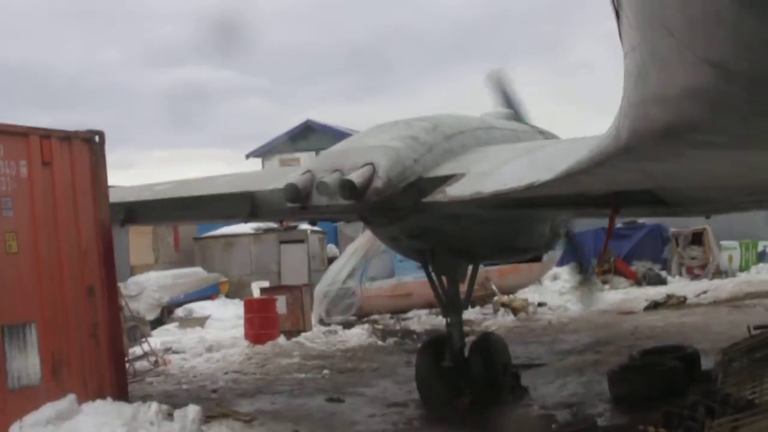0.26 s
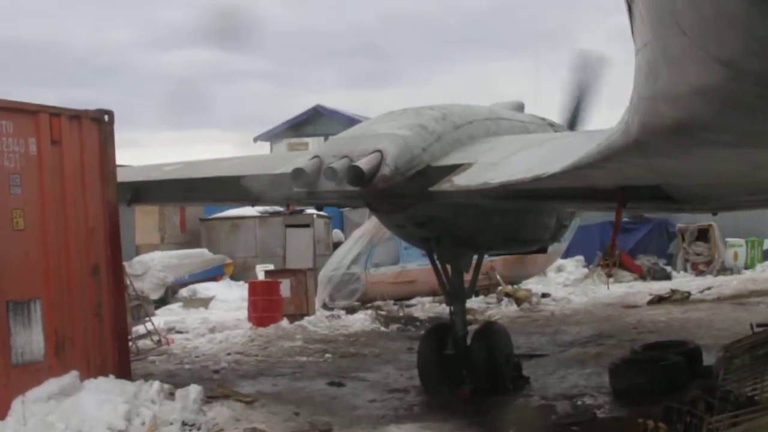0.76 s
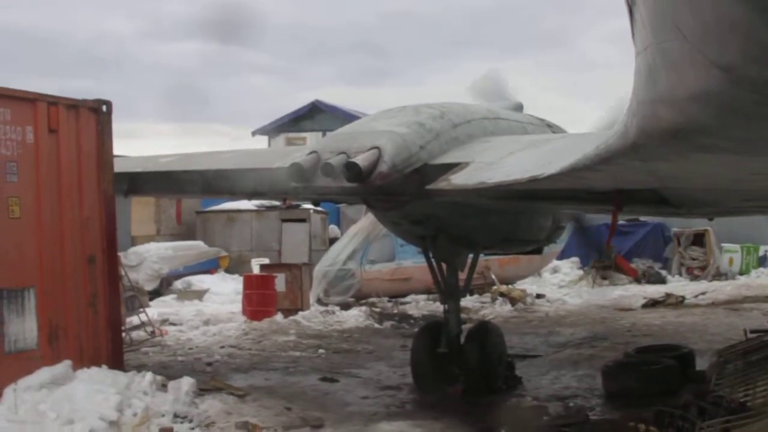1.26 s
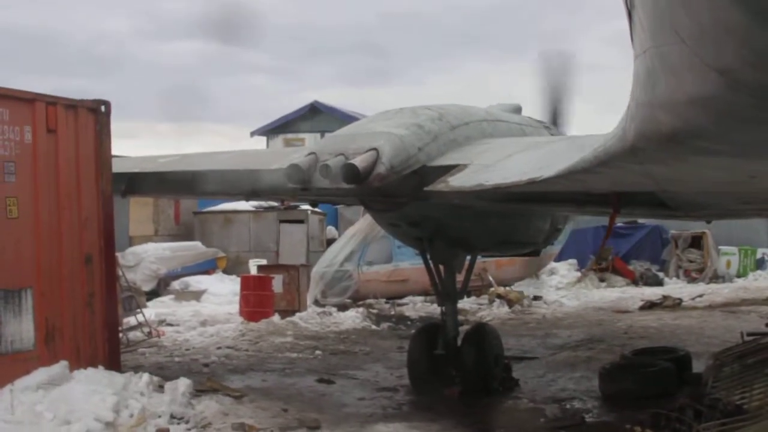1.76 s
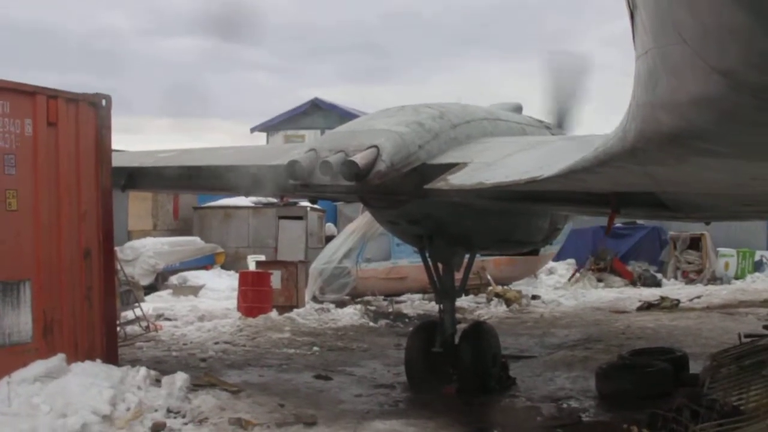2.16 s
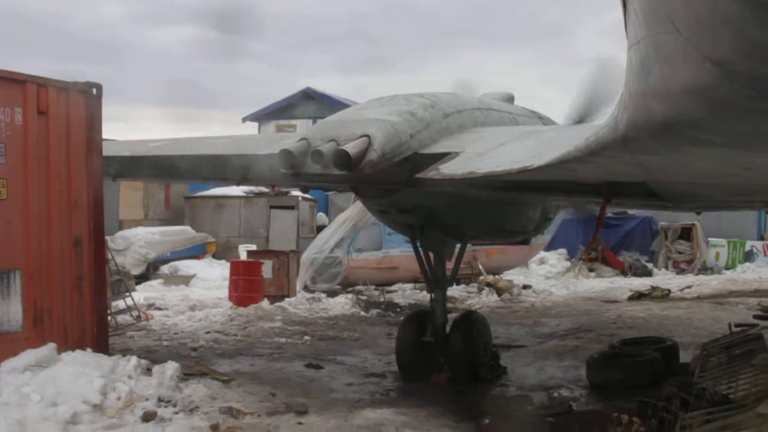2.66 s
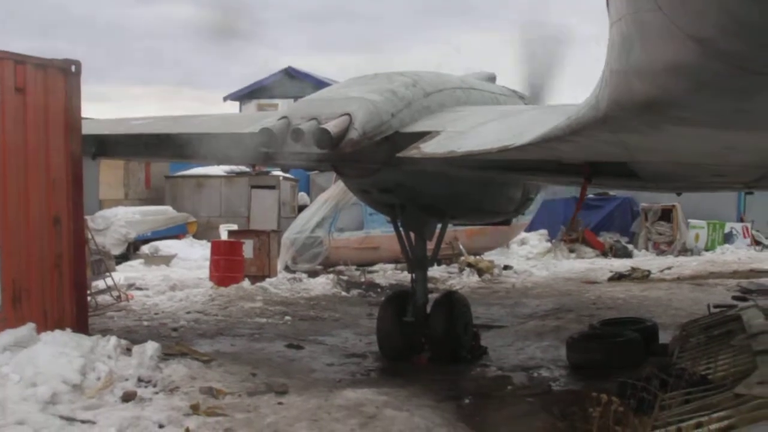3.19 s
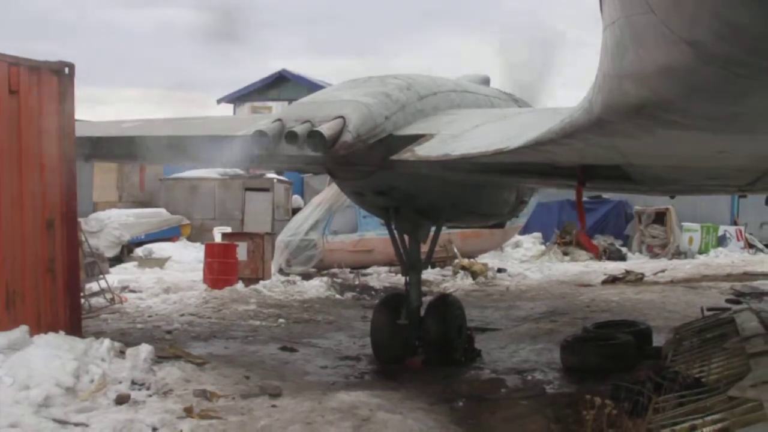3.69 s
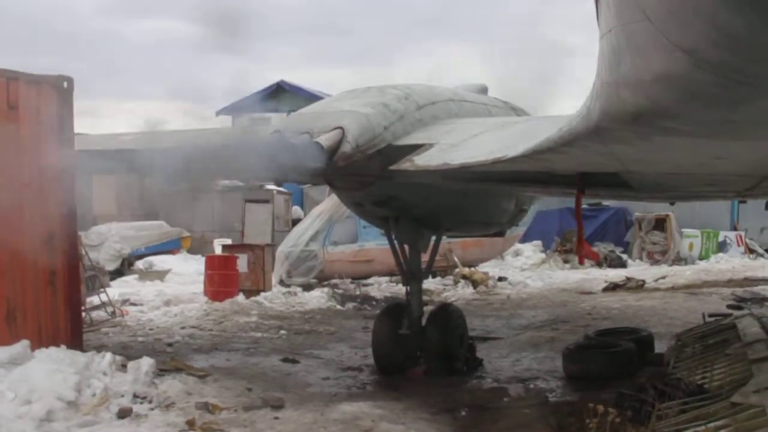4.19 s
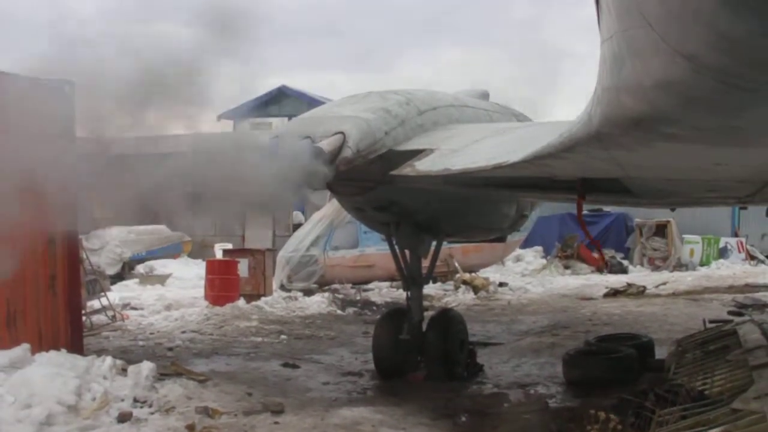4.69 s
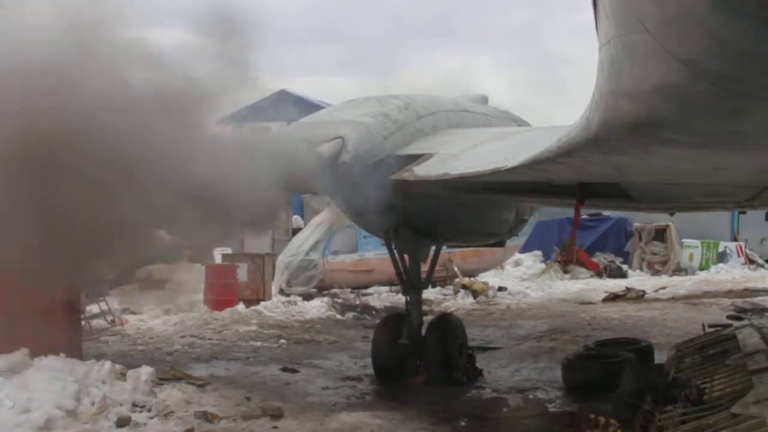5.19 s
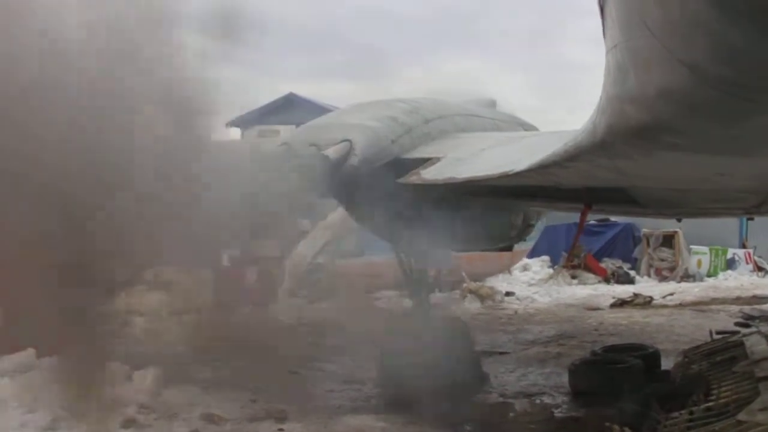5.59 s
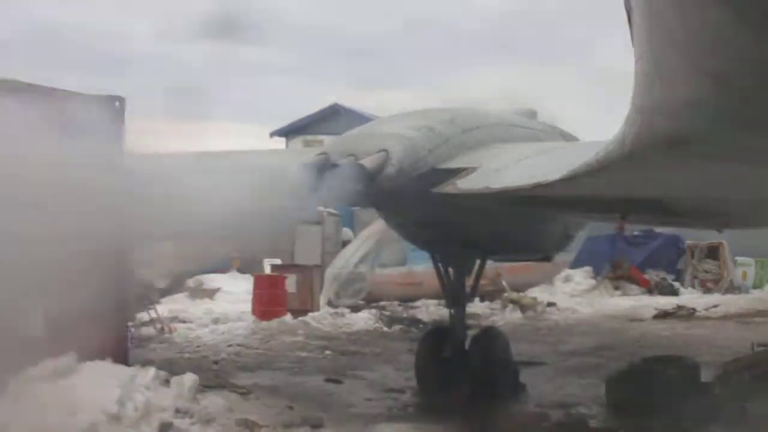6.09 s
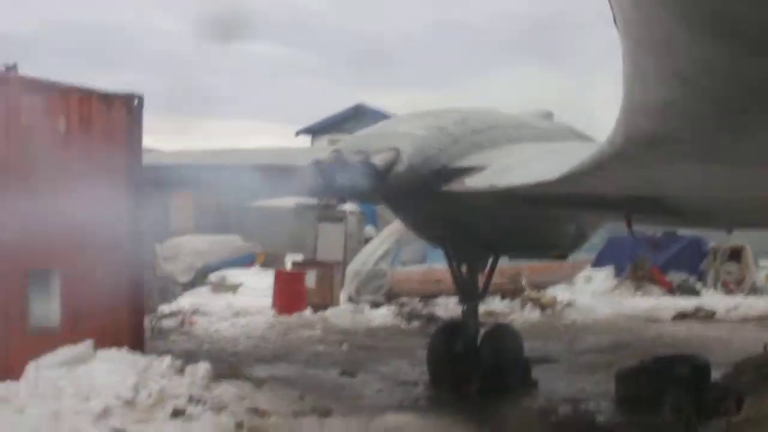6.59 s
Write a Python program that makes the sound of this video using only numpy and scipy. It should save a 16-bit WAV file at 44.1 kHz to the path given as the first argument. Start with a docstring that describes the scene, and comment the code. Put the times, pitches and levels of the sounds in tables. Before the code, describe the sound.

A large piston aircraft engine starts in an open yard, heard from behind its exhaust pipes on a small microphone. At 0 s a short starter rumble fades to a faint grind with a thin high whine; small hisses and squeaks appear around 0.1 to 0.4 s and faintly near 2.3 s. Single cylinders fire irregularly: breathy, spitting chuffs with hollow metallic ringing, clustered in the first 1.2 s, then sparser, with gaps around 1.3 and 2.6 s. From 2.9 s firings come rapidly, with dull thumps, stuttering harder from 4.3 s. Around 5 s heavy barks lead into a merged, throbbing, raspy roar, with uneven pops still poking through. From 5.7 to 6.4 s propeller wash buffets the microphone, with crackling, clipped shoves and the level squeezed down. After 6.5 s wind and roar ease somewhat, the engine still running at the cut. Short, sparse echoes answer throughout.

```python
"""Cold start of a piston aircraft engine

A large engine catches in a yard, heard from behind its exhaust stacks. Single cylinders fire as
hissing chuffs, pulsed jet noise ringing the pipes, over the starter's whine and rumble; the firings
then crowd into a roar of throbbing noise. Sparse decaying echoes answer the exhaust. The propeller's
wash, low-frequency noise with brief shoves, reaches the small microphone and drives it to its stops."""
import sys
import numpy as np
from scipy import signal
from scipy.fft import rfft, irfft
from scipy.io import wavfile
from scipy.ndimage import uniform_filter1d

SR = 44100
rng = np.random.default_rng(int(sys.argv[2]) if len(sys.argv) > 2 else 0)


def materialize(psi):
    """Save the field psi as 16-bit PCM at rate SR to the path in sys.argv[1].

    A 1-D psi becomes a single channel; in a 2-D psi each row is a channel.
    """
    bounded = np.clip(np.atleast_2d(psi).T, -1, 1)
    quanta = np.round(bounded * 32767).astype(np.int16)
    wavfile.write(sys.argv[1], SR, quanta)


def level_to_linear(level):
    """Convert decibel levels to linear amplitude factors, elementwise."""
    exponent = np.asarray(level, float) / 20
    return 10 ** exponent


N = 302085

# Individual firings, before the run-up gain:
# [t/s, jet level/dB, thump drive level/dB, treble lift/dB, blow-down time scale/ms]
FIRINGS = [(0.019, -36, -50, -7, 22), (0.056, -18.5, -15.5, 4, 18), (0.335, -17, -43, -6.5, 24.3),
           (0.419, -24.5, -47, -8, 17), (0.5553, -15.5, -37, -1.5, 18.2), (0.619, -20, -57, 3, 21.4),
           (0.848, -24.5, -20, 9, 15.9), (0.9973, -22, -33, 4.5, 16.1), (1.147, -23, -19.5, 3, 16.3),
           (1.658, -19.5, -47, 2.5, 13.2), (1.9253, -40.5, -34, -17, 24), (1.9961, -20.5, -18, 2.5, 18.7),
           (2.0804, -23.5, -16, 9, 15.2), (2.127, -20.5, -41, -0.5, 14.4), (2.385, -16.5, -33, -9, 19.6),
           (2.923, -14.5, -18.5, -5.5, 17.6), (3.077, -16.5, -14, -3.5, 20.8),
           (3.1208, -26, -14.5, 11, 8.5), (3.1814, -20.5, -16, -3, 21), (3.2111, -18.5, -16, 3, 14.6),
           (3.2791, -23.5, -12.5, 2, 13.7), (3.3979, -16, -23, -0.5, 13.5), (3.438, -22.5, -38, 3.5, 11.8),
           (3.484, -19.5, -32, 6, 15.2), (3.5211, -16.5, -12, 1, 11), (3.57, -18.5, -44, 3.5, 19),
           (3.613, -19.5, -16.5, 3.5, 20.6), (3.6438, -18.5, -23, 2, 13), (3.718, -29, -23, 13.5, 12),
           (3.7649, -14, -43, -0.5, 10.3), (3.7913, -26, -40, 5, 12), (3.8556, -16.5, -13.5, 3.5, 22.3),
           (3.8974, -17, -17, 2, 19.7), (3.9631, -18, -27, 4, 16), (4.0197, -30.5, -18.5, 12.5, 17),
           (4.0444, -18, -42, 7.5, 6.5), (4.083, -18.5, -47, 6.5, 18.7), (4.116, -18, -20, 8, 8.8),
           (4.2006, -16, -17.5, 3, 19.5), (4.245, -23.5, -16.5, -5, 18.4), (4.327, -12, -20, 1, 10.4),
           (4.3695, -20.5, -25.5, 7.5, 16.4), (4.4061, -10.5, -10.5, 0, 7.5), (4.4336, -9, -10, -7, 6),
           (4.46, -14, -29, 4.5, 11.3), (4.5283, -22.5, -20, 4.5, 8.6), (4.5565, -13.5, -37, -2.5, 12),
           (4.591, -13.5, -13, 1, 17), (4.651, -16, -17, 3, 13.7), (4.692, -17.5, -34, -8, 19),
           (4.7192, -11, -9, -22, 7.7), (4.753, -21, -19, 8, 11), (4.7822, -12, -28, 0, 6.5),
           (4.8442, -15.5, -12, -1, 17.4), (4.8799, -15.5, -8, -5, 23), (4.951, -15.5, -12.5, -4, 24),
           (5.0098, -8, -40, -8, 15), (5.0489, -8.5, -4, -7, 14.3), (5.0794, -18, -34, -8, 20.5),
           (5.1465, -16.5, -35, 2, 15), (5.201, -14.5, -29, -2, 16.5), (5.251, -14.5, -27, -3, 14),
           (5.3071, -8.5, -32, -10, 16.6), (5.3404, -8, -34, -5, 22), (5.398, -18.5, -30, 5, 11),
           (5.472, -17.5, -27, -7, 14), (5.498, -18, -32, 1, 20), (5.595, -22, -26, -7, 17),
           (5.651, -17, -30, 2, 15), (5.716, -23, -30, 2, 16), (5.7783, -17, -23, 12, 8),
           (5.812, -21, -30, -4, 12), (5.922, -24, -30, -5, 12), (5.9876, -13.5, -20, -11, 22),
           (6.043, -18, -30, -3, 13.4), (6.077, -21, -30, 5, 15), (6.1167, -7, -48, 1, 11),
           (6.175, -22, -32, -5, 14), (6.2171, -21, -29, 5, 19), (6.301, -19, -28, 0, 23),
           (6.387, -21, -33, -1, 21), (6.434, -15, -35, 9, 11), (6.483, -22.5, -28, 0, 13),
           (6.519, -25, -20, 9, 22), (6.606, -31, -27, -2, 11), (6.6421, -18, -15, -1, 14.5),
           (6.724, -16, -30, 1, 16), (6.8225, -17, -30, -7, 12)]
# Colour of each row of FIRINGS: [favoured pipe mode f/Hz, its extra level/dB, jet whistle f/Hz, its extra level/dB]
COLOURS = [(940, -1, 3800, 1), (1360, 3, 3890, 4), (1010, 4, 2260, -7), (1320, 3, 3800, 7),
           (990, -8, 2070, 2.5), (1130, 4, 2100, -1), (1080, -5, 2540, 0), (1000, 0, 3690, 3),
           (1330, 5.5, 3200, 0), (1350, 2, 2800, -2), (1370, 8, 3940, -5), (1370, 7, 2900, -3),
           (1090, 3, 1800, 1), (1390, -2, 2370, 4), (1320, 1.5, 2360, -11), (1390, 9, 2100, 0),
           (960, 2, 2800, 1), (1300, 6, 2900, 5), (940, 1, 4600, -10), (1330, 3.5, 3650, -3),
           (960, 11.5, 2090, 1), (1410, 0, 3500, -13), (1130, 4, 2450, 5), (1000, 2, 2500, 3),
           (1310, 6, 2770, 1), (1130, 1, 3200, -1), (1680, -6, 1800, -6), (1350, -5, 3000, 8),
           (1360, 0, 2000, 2), (1700, 11, 3640, -8.5), (1300, -6, 2170, 3), (1280, -6, 4600, -4),
           (920, 0, 2800, -0.5), (1360, 0, 2440, -1), (1340, 0, 4120, 2), (1350, 5, 1800, -8),
           (1320, 0, 2200, 0), (1710, -5, 2440, -3), (1180, -2, 1980, -7), (1350, 5, 2050, 1),
           (940, -7, 2270, -1.5), (1270, 2, 3000, 2), (1630, 4, 2300, 0), (1170, -2, 2110, -2),
           (1330, 2, 2230, 2), (1370, 0, 3800, -6), (960, -5, 4000, 3), (980, -3, 2690, 0),
           (1230, 2, 2370, -3), (960, 2, 3400, 2), (960, 8, 2240, -5), (940, 3, 2600, 5),
           (960, -0.5, 2430, 0), (940, 3, 2060, -2.5), (1320, 0, 2200, -10), (1680, -1, 2670, -4),
           (1710, 0, 2000, -6), (1340, 0, 2710, -5), (1330, -2, 3030, -6), (1550, 0, 2660, 0),
           (1110, -4, 1830, 0), (1320, 5, 3230, 0), (1270, 0, 4900, -7), (950, 6, 2600, -1),
           (1270, -10, 2420, -1), (1250, -2, 2750, 0), (930, -1, 2860, 5), (980, -3, 2400, -7),
           (1270, -2, 2100, 3), (1350, -1, 3190, 0), (1270, 0, 2000, -2), (1300, -4, 2680, 0),
           (1190, -1, 2220, 0), (1280, -4, 2420, -1), (900, 0, 2790, -1), (940, 0, 2240, -3),
           (1310, -5, 3260, -6), (1350, -1, 2000, -2), (1740, -2, 2670, -1), (940, 0, 2300, -11),
           (1300, 0, 2500, 5), (1530, -7, 3530, -2), (1220, 0, 1940, -2), (1460, -3, 2330, 1),
           (990, -4, 3800, 1), (1300, -2, 2500, -1), (970, 1, 2560, 6), (1370, 0, 3140, -2)]
# The engine picking up: [t/s, gain added to each firing/dB, merged roar level/dB, propeller wash level/dB]
RUNUP = [(0, 1, -51, -38), (.35, -0.7, -49, -44), (1.3, -2, -84, -49), (2.0, -1, -66, -43.5),
         (2.7, -5.5, -66, -47), (3.5, 2, -56.5, -32.5), (4.3, 6.5, -45, -28.5), (4.6, 5, -51, -29),
         (4.9, 6.5, -33, -22.5), (5.2, 7.5, -12, -26), (5.5, 12, -10.5, -39), (5.7, 14, -7, -6.5),
         (5.85, 9, -8, -1), (6.0, 9, -9.5, -6), (6.35, 12, -5, -3), (6.55, 14, -15.5, -14),
         (6.85, 3, -15.5, -9)]
# The engine turned over by its starter: [t/s, rumble level/dB, gear whine level/dB]
STARTER = [(0, -23, -41), (.3, -41, -50), (.8, -36, -53), (1.4, -42.5, -59), (1.65, -36.5, -54),
           (1.9, -41, -57), (2.7, -41, -62), (3.2, -36.5, -50), (6.85, -68, -86)]
# Gusts that pin the microphone to a stop: [centre t/s, length/ms]
GUSTS = [(5.748, 3), (5.762, 5.3), (5.791, 9.2), (5.849, 2.3), (5.886, 3.4), (5.904, 4.3), (6.063, 14.3),
         (6.086, 3.8), (6.172, 7.3), (6.208, 15.7), (6.27, 6.1), (6.293, 8.3), (6.407, 2.8)]
# Short hisses and squeaks while cranking, perhaps leaks past valves:
# [t/s, level/dB, f/Hz, width of each resonance/Hz, length/ms]
SQUEAKS = [(0.086, -30, 4600, 198, 30), (0.11, -41, 4170, 445, 114), (0.075, -44, 5240, 8200, 145),
           (.235, -57, 7300, 200, 39), (.14, -55, 13400, 400, 70), (.24, -60, 13500, 400, 38),
           (0.41, -31, 3150, 500, 25), (0.425, -40, 3500, 350, 52), (1.76, -60, 13600, 300, 40),
           (2.285, -47, 3910, 870, 73), (2.3, -56, 6790, 1300, 65)]
# Relative spectrum of the exhaust jet: [f/Hz, level/dB per Hz]
JET_SPECTRUM = [(40, 4.5), (120, -7.5), (300, -1), (650, -6), (1200, -3.5), (2300, -2), (4000, -5.5),
                (7000, -12.5), (11000, -18.5), (16000, -19.5)]
# Relative spectrum of the cranking rumble: [f/Hz, level/dB per Hz]
CRANKING_SPECTRUM = [(18, -59), (30, 7.5), (210, -3), (239, -1.5), (280, -30), (336, 4), (584, -6),
                     (889, -5), (3490, -19), (4080, -25), (4420, -23.5), (11700, -35), (16000, -33)]
# Relative spectrum of the merged roar: [f/Hz, level/dB per Hz]
ROAR_SPECTRUM = [(24, -53), (40, 0.5), (283, -7), (335, 5.5), (430, 5), (630, -8), (1150, -11),
                 (1300, -1.5), (1440, -10.5), (2630, -10), (6650, -20.5), (16000, -36)]
# Exhaust pipe resonances: [f/Hz, width/Hz, level before the ring settings/dB]
STACK_MODES = [(94.8, 14, 5), (246, 21, -4.5), (340.3, 13.3, 1), (438, 71, 3), (703.5, 12, 6),
               (952, 33, 7.5), (1120, 95, -0.5), (1341, 41, 4.5), (1712, 48, -1), (2010, 130, -6),
               (2368, 90, -0.5), (2757, 50, -4.5), (3090, 35, -11.5), (3776, 46, -1.5), (4480, 51, -17)]
# Decay time of the yard's echoes by 60 dB: [f/Hz, t60/s]
YARD_DECAY = [(200, 0.53), (600, 0.28), (1500, 0.34), (3000, 0.24), (6000, 0.14), (12000, 0.102)]

WHINE_HZ = 3920
# once the engine has caught, firings crowd in unevenly; the gap is a median
CAUGHT_S, CROWD_GAP_S, CROWD_MS = 5.38, 0.05, 13.2
CROWD_DB, CROWD_SPREAD_DB, CROWD_THUMP_DB = -25.5, 4.5, -25
WHISTLE_HZ, WHISTLE_SPREAD = 1986, 0.27  # lowest whistle of the crowd, scale of the scatter above it
FAVOURED_LOW_HZ, FAVOURED_HIGH_HZ = 900, 1860  # range of the pipe mode each of the crowd rings most
RING_DB, RING_FADE = -13, 0.23  # pipe ring under a 0 dB roar; it stands out more the weaker the roar


def evened(x):
    """Power normalisation: scales to rms 1."""
    return x / np.sqrt(np.mean(x ** 2) + 1e-20)


def read(points, hz):
    """Logarithmic frequency scale: interpolates a spectrum along it."""
    f, value = np.transpose(points)
    return np.interp(np.log(hz + 1), np.log(f + 1), value)


def curves(rows):
    """Linear interpolation in time: each column of a table at every sample."""
    s, *columns = np.transpose(rows)
    return [np.interp(np.arange(N) / SR, s, column) for column in columns]


def coloured(points):
    """Spectral shaping: white noise weighted by the given spectrum, at rms 1."""
    spectrum = rfft(rng.standard_normal(N))
    weight = level_to_linear(read(points, np.fft.rfftfreq(N, 1 / SR)))
    return evened(irfft(spectrum * weight, N))


def band_noise(lo_hz, hi_hz):
    """Band limitation: gently band-passed noise of rms 1."""
    sos = signal.butter(2, [lo_hz, hi_hz], "band", fs=SR, output="sos")
    return evened(signal.sosfilt(sos, rng.standard_normal(N)))


def resonate(x, hz, width):
    """Resonance by heterodyning: shifts the curve hz to zero, smooths and shifts back, with gain 1."""
    turn = np.exp(2j * np.pi * np.cumsum(hz * np.ones(len(x))) / SR)
    r = np.exp(-np.pi * width / SR)
    return 2 * (turn * signal.lfilter([1 - r], [1, -r], x / turn)).real


def uneven_patches(shape, frames, bins):
    """Local correlation: smooths a time-frequency grid of random values, at rms 1."""
    smooth = uniform_filter1d(rng.standard_normal(shape), bins, 0)
    return evened(uniform_filter1d(smooth, frames, 1))


def patchy(x, depth_db, frames, bins):
    """Non-stationary spectrum: random louder and softer patches over time and frequency, at rms 1."""
    z = signal.stft(x, SR, nperseg=512)[2]
    z = z * level_to_linear(depth_db * uneven_patches(z.shape, frames, bins))
    return evened(signal.istft(z, SR, nperseg=512)[1][:N])


def add(mix, s, sound):
    """Superposition: mixes a sound in from time s."""
    part = mix[max(round(s * SR), 0):][:len(sound)]
    part += sound[:len(part)]


def starter():
    """Mechanical excitation: patchy broadband rumble with a thin, frequency-modulated gear whine."""
    rumble_db, whine_db = curves(STARTER)
    rumble = patchy(coloured(CRANKING_SPECTRUM), 1.6, frames=8, bins=7)
    waver = 1 + 0.0015 * band_noise(5.6, 30)
    flicker_db = 2.6 * band_noise(4.5, 60)
    whine = np.sin(2 * np.pi * np.cumsum(WHINE_HZ * waver) / SR)
    return level_to_linear(rumble_db) * rumble + level_to_linear(whine_db + flicker_db) * whine


def wash():
    """Flow-induced pressure: lumpy low buffeting at the microphone, with a few far stronger shoves."""
    wash_db = curves(RUNUP)[2]
    depth = np.clip(0.59 + 0.0039 * wash_db, 0, 1)  # lumpier as it strengthens
    lumps = np.exp(depth * band_noise(2.2, 24.0) - depth ** 2)
    air = level_to_linear(wash_db) * lumps * band_noise(33.6, 235)
    for (s, ms), side in zip(GUSTS, rng.choice([-1., 1.], len(GUSTS))):
        shove = signal.windows.hann(max(round(ms * SR / 1000), 9))
        add(air, s - len(shove) / SR / 2, side * level_to_linear(8) * shove)
    return air


def blow_downs(firings):
    """Cylinder discharge: flow pulses for three treble ranges, and the damped thumps of the pipe."""
    lead_s, swell = 0.01094, 2.0  # pulses start ahead of the table's times
    flow, treble, top, knocks = np.zeros((4, N))
    t = np.arange(SR // 4) / SR
    push = (t / 0.012) * np.exp(1 - t / 0.005)
    thumps_hz = 335 + 85 * rng.random(len(firings)) ** 2
    for (s, db, thump_db, lift_db, ms), thump_hz in zip(firings[:, :5], thumps_hz):
        start = s - lead_s
        u = t / max(ms, 2) * 1000
        # the valve opens, the cylinder empties
        blow = (1 - np.exp(-u / 0.37)) ** swell * np.exp(-(u / 1.524) ** 1.84)
        blow /= blow.max()
        add(flow, start, level_to_linear(db) * blow)
        # the treble comes later and is briefer
        add(treble, start + 0.0078, level_to_linear(db + lift_db) * blow ** 1.17)
        add(top, start + 0.0029, level_to_linear(db + lift_db) * blow ** 1.42)
        add(knocks, start - 0.0015, level_to_linear(thump_db) * push * np.sin(2 * np.pi * thump_hz * t))
    latest = np.searchsorted(firings[:, 0] - lead_s, np.arange(N) / SR) - 1
    return flow, treble, top, knocks, np.maximum(latest, 0)


def turbulent_jet(flow, treble, top, crackle, power_db):
    """Turbulent jet noise: eddies colour every blast differently, each range with its own pulse."""
    jet = patchy(coloured(JET_SPECTRUM), 2.3, frames=3, bins=3)
    low, mid = (signal.sosfilt(signal.butter(1, hz, fs=SR, output="sos"), jet) for hz in (3800, 9000))
    sizzle = level_to_linear(7 - 1.78 * power_db)  # lone cold firings spit the brightest
    return crackle * (flow * low + treble * (mid - low) + sizzle * top * (jet - mid))


def merged_roar(roar_db):
    """Overlapping pulses: the other cylinders as unevenly throbbing noise with a wandering peak."""
    throb = np.exp(0.31 * band_noise(25.0, 50.5))
    roar = level_to_linear(roar_db) * throb * patchy(coloured(ROAR_SPECTRUM), 1.6, frames=4, bins=4)
    rasp_hz = 2600 * (1 + 0.28 * band_noise(1.28, 21.4))
    return roar + level_to_linear(3.5) * resonate(roar, rasp_hz, 300)


def pipe_rings(gas, latest, favoured_hz, pipe_db, power_db, roar_db, count):
    """Pipe resonance: modes ring in turn, differing from shot to shot with each cylinder's place and heat."""
    detune, uneven_db, favour_db = 0.008, 3.0, 3.5
    ring_db = RING_DB - RING_FADE * roar_db
    chance = rng.standard_normal((count, len(STACK_MODES), 2))
    spread = detune * level_to_linear(power_db)
    wobble = 0.011 * band_noise(7.7, 76)  # hot and cold gas stirs the rings
    for k, (hz, width, db) in enumerate(STACK_MODES):
        shift, strength = (uniform_filter1d(chance[latest, k, j], 200) for j in range(2))
        near = np.exp(-(np.log(favoured_hz / hz) / 0.053) ** 2)
        chance_db = uneven_db * np.clip(strength, -2, 1.1) * min(hz / 700, 1)
        mode_db = db + ring_db + chance_db + (favour_db + pipe_db) * near
        mode_hz = hz * (1 + (spread * shift + wobble) * min(hz / 1000, 1))
        gas = gas + resonate(level_to_linear(mode_db) * gas, mode_hz, width)
    return gas


def exhaust():
    """Source and resonator: thumps, pulsed jets and roar excite the pipes; a whistle bypasses them."""
    power_db, roar_db, _ = curves(RUNUP)
    firings = np.vstack([np.hstack([FIRINGS, COLOURS]), crowd()])
    firings = firings[np.argsort(firings[:, 0])]
    flow, treble, top, knocks, latest = blow_downs(firings)
    favoured_hz, pipe_db, whistle_hz, shrill_db = firings[latest, 5:].T
    whistle = evened(resonate(rng.standard_normal(N), whistle_hz, 155))
    crackle = np.exp(0.27 * band_noise(56, 1200))  # the jet breaks up
    jet = turbulent_jet(flow, treble, top, crackle, power_db)
    gas = level_to_linear(power_db) * (jet + knocks) + merged_roar(roar_db)
    gas = pipe_rings(gas, latest, favoured_hz, pipe_db, power_db, roar_db, len(firings))
    # sung past the pipe's mouth
    return gas + level_to_linear(power_db - 9 + shrill_db) * crackle * flow * whistle


def yard(x):
    """Reflection and absorption: sparse echoes off sheds, wing and ground, each band dying unevenly."""
    taps = np.zeros((3, SR // 2))
    slots = np.arange(300, SR // 2 - 20, 20) + rng.integers(0, 20, (3, (SR // 2 - 301) // 20))
    np.put_along_axis(taps, slots, rng.choice([-1., 1.], slots.shape), 1)
    hz, t, z = signal.stft(taps, SR, nperseg=256)
    smooth = uniform_filter1d(rng.standard_normal(z.shape), 3, 1)
    patches = evened(uniform_filter1d(smooth, 6, 2))
    decay_db = -60 * t / np.maximum(read(YARD_DECAY, hz), .02)[:, None]
    tails = signal.istft(z * level_to_linear(1.5 * patches + decay_db), SR, nperseg=256)[1]
    # three paths take turns, 4.3 Hz and a third of a cycle apart
    phase = 4.3 * np.arange(N) / SR + np.arange(3)[:, None] / 3
    turns = np.sqrt(2 / 3) * np.cos(2 * np.pi * phase)
    return signal.fftconvolve(x * turns, tails / np.linalg.norm(tails[0]), axes=1).sum(0)[:N]


def squeaks():
    """Narrow-band noise: two equal resonances in series give short hisses with soft ends."""
    out = np.zeros(N)
    for s, db, hz, width, ms in SQUEAKS:
        shape = signal.windows.tukey(round(max(ms, 5) * SR / 1000), .7)
        hiss = resonate(resonate(rng.standard_normal(SR // 5), hz, width), hz, width)
        add(out, s, level_to_linear(db) * shape * evened(hiss)[:len(shape)])
    return out


def crowd():
    """Random pulse train: rows like FIRINGS with COLOURS, at uneven gaps once the engine has caught."""
    gap, size, thump, lift, length = rng.standard_normal((80, 5)).T
    pitch, place = rng.random((80, 2)).T
    s = CAUGHT_S + np.cumsum(CROWD_GAP_S * np.exp(.35 * gap))
    jet_db = CROWD_DB + CROWD_SPREAD_DB * size
    thump_db = CROWD_THUMP_DB + 6 * thump
    ms = CROWD_MS * np.exp(0.18 * length)
    favoured_hz = FAVOURED_LOW_HZ * (FAVOURED_HIGH_HZ / FAVOURED_LOW_HZ) ** place
    whistle_hz = WHISTLE_HZ * (1 - WHISTLE_SPREAD * np.log(1 - .98 * pitch))
    rows = [s, jet_db, thump_db, 3 * lift, ms, favoured_hz, 0 * s, whistle_hz, 0 * s]
    return np.transpose(rows)[s < N / SR]


def scene():
    """Linear superposition: exhaust with its echoes, starter, squeaks and propeller wash."""
    engine = exhaust()
    echoes = level_to_linear(-8.5) * yard(engine)
    return (engine + echoes + starter() + squeaks() + wash())[None]


def low_pass(x):
    """Removes everything above the highest recorded frequency."""
    return signal.sosfilt(signal.butter(12, 16000, fs=SR, output="sos"), x)


def record(dry):
    """Saturation and compression: the input hits its stops, bass is cut, gain control turns it down."""
    stop, knee_db, share = 0.51, -28, 0.4  # share: dB of reduction per dB above the knee
    thin = np.clip(dry, -stop, stop)
    thin = signal.lfilter(*signal.butter(1, 240, "high", fs=SR), thin)
    thin = signal.lfilter(*signal.butter(1, 45, "high", fs=SR), thin)
    thin = signal.lfilter(*signal.butter(1, 8500, fs=SR), thin)  # the top is rounded off
    steep = signal.firwin(511, 16050, window=("kaiser", 9), fs=SR)
    thin = signal.oaconvolve(thin, steep[None], "same")
    memory = np.exp(-1 / (.25 * SR))  # follows the power over 0.25 s
    power = signal.lfilter([1 - memory], [1, -memory], thin ** 2)
    power_db = 10 * np.log10(power + 1e-9)
    finished = thin * level_to_linear(-share * np.maximum(power_db - knee_db, 0))
    return low_pass(finished)


dry = scene()
out = record(dry)
materialize(out)
```